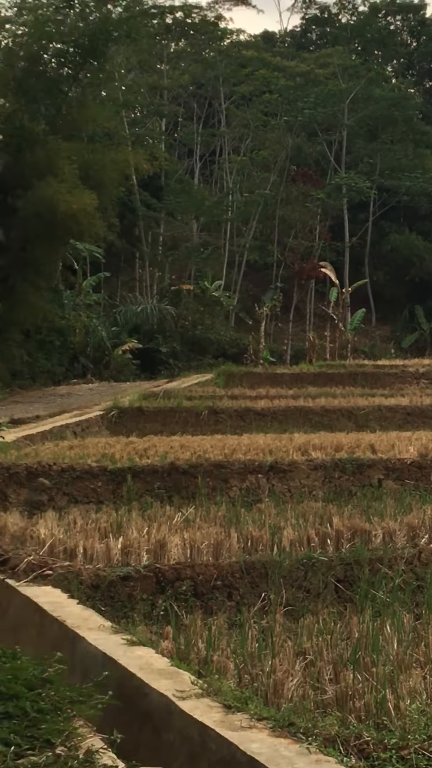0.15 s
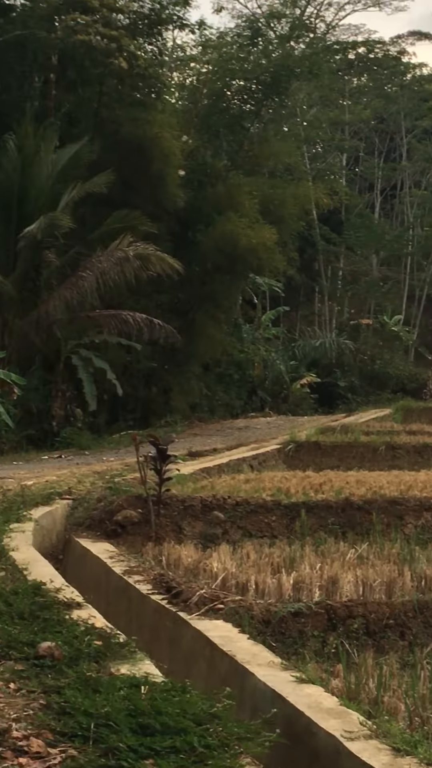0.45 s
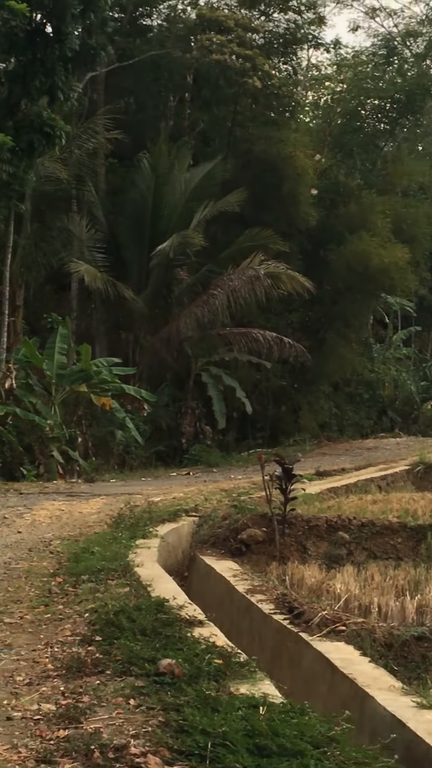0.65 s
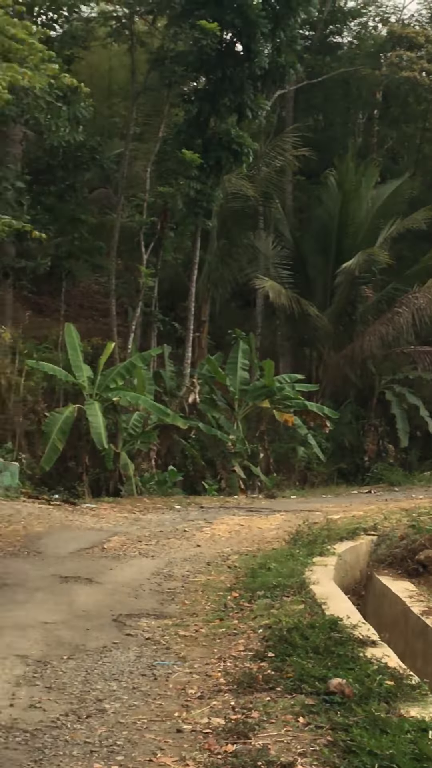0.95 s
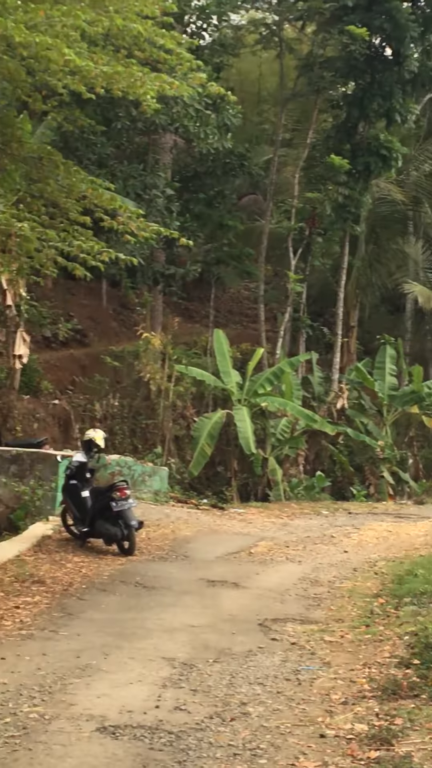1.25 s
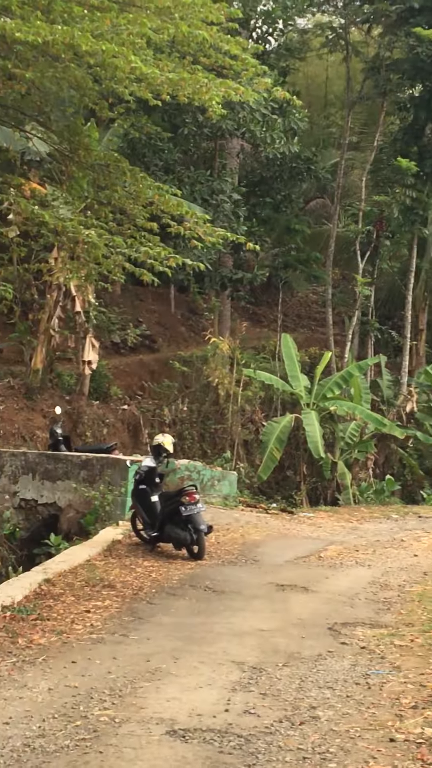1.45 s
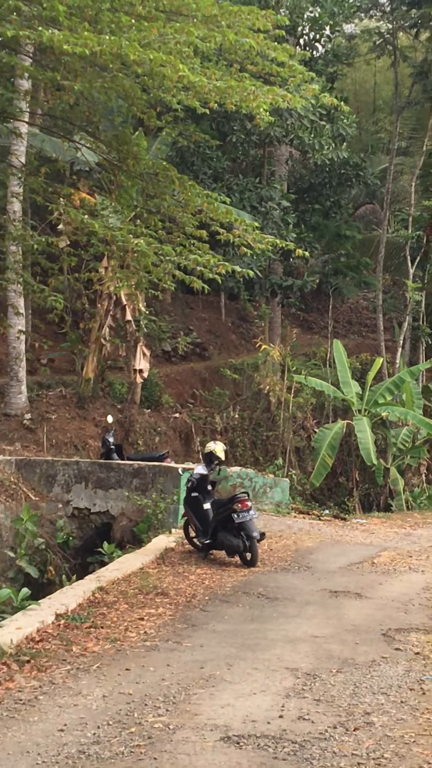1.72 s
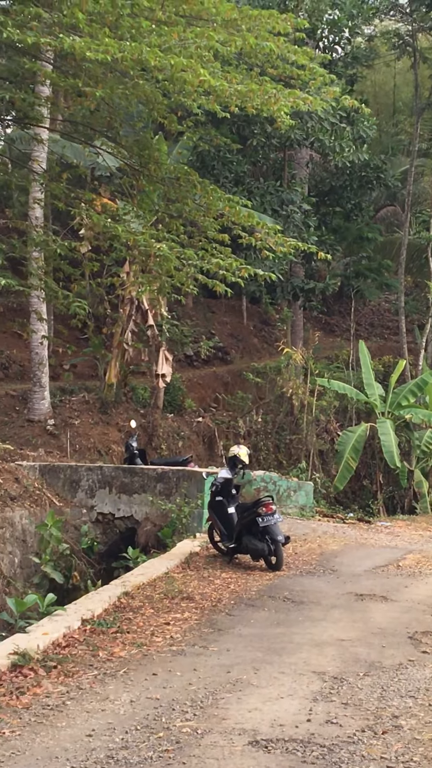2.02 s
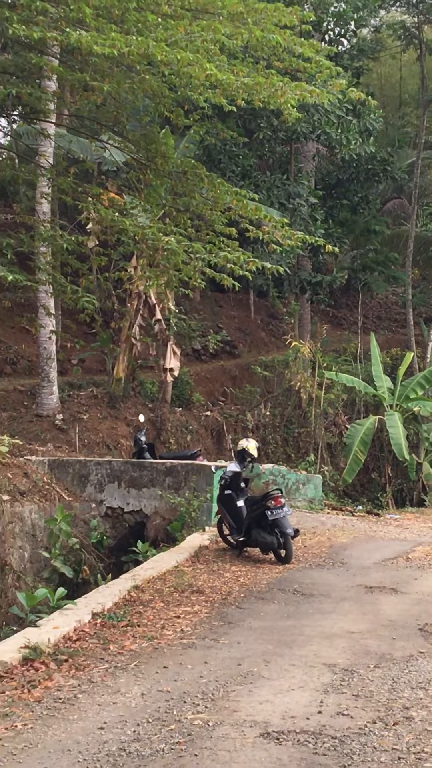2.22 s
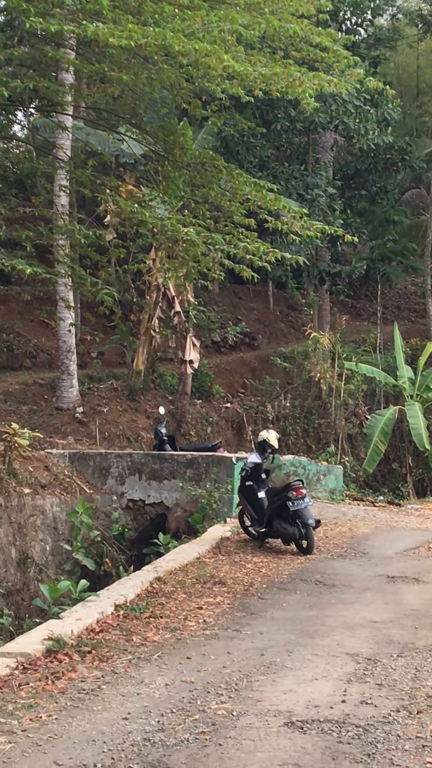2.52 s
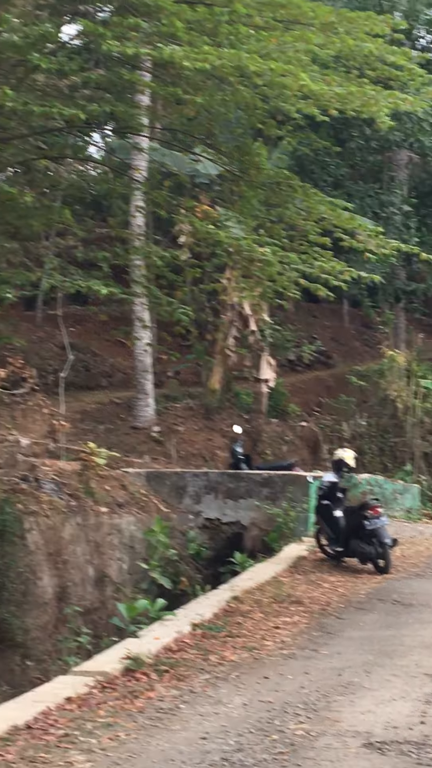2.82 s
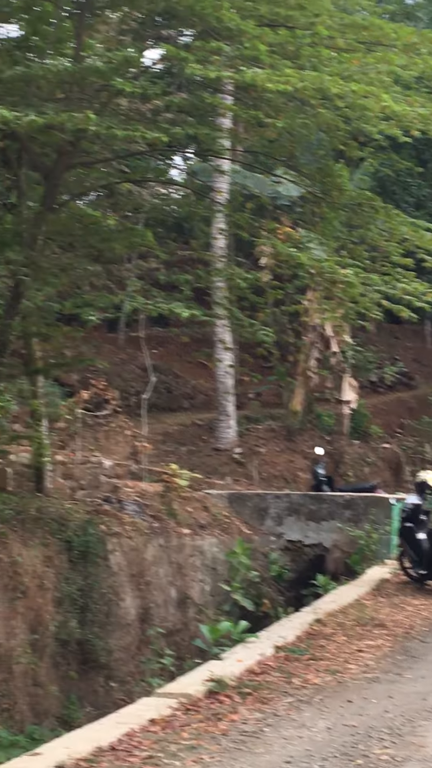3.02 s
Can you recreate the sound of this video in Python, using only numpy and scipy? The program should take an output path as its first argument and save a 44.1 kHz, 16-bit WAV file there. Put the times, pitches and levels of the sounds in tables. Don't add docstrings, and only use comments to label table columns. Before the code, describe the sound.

A motorbike's low, uneven single-cylinder thumping nears outdoors, slowing slightly until about 1.8 s. Dry leaves snap and rustle close to the phone microphone, mostly before 1 s, again near 2.7 s. Faint cicadas buzz over valley hum; a cricket trills at 0 and 1.2 s, and soft far bird notes sound until 2 s. From 2 s the throttle booms, with tyre roar and clatter swelling loudest at the 3.2 s end.

```python
import sys
import numpy as np
from scipy import signal
from scipy.io import wavfile
from scipy.ndimage import uniform_filter1d

SR = 44100
rng = np.random.default_rng(int(sys.argv[2]) if len(sys.argv) > 2 else 0)


def unload_audio(sound):
    columns = np.transpose(np.atleast_2d(sound))
    steps = np.round(np.clip(columns, -1, 1) * 32767)
    wavfile.write(sys.argv[1], SR, steps.astype(np.int16))


def boost(x):
    u = np.asarray(x, float) / 20
    return 10 ** u


N = 139356

# f/Hz, density/dB per Hz
VALLEY_SPECTRUM = [(200, 5.5), (370, -4.5), (750, -12.5), (1500, -14), (2700, -21), (4000, -24),
                   (8000, -35.5), (15700, -45)]
# start t/s, length/s, level/dB
CRICKET_TRILLS = [
    (0.0, 0.51, -70),
    (1.19, 0.5, -73.5),
]
# t/s, firing f/Hz
FIRING_RATE = [(0.0, 32.59), (0.3, 31.1), (0.6, 29.83), (0.9, 28.34), (1.15, 27.01), (1.4, 26.66),
               (1.62, 25.35), (1.8, 25.45), (1.95, 24.79), (2.1, 26.03), (2.25, 26.84), (2.45, 26.98),
               (2.65, 27.4), (2.8, 27.68), (2.95, 26.66), (3.16, 25.3)]
# t/s, exhaust level/dB, throttle level/dB, tyre level/dB, clatter level/dB
APPROACH = [(0, -41.5, -80, -75, -64), (.5, -38.5, -70, -69, -72), (1.0, -36, -61, -55.5, -70.5),
            (1.5, -34, -66, -64.5, -67.5), (1.8, -35.5, -45, -59.5, -70), (1.95, -35.5, -44.5, -65, -67.5),
            (2.1, -39, -36.5, -58, -67), (2.3, -37, -43, -52, -64), (2.5, -35.5, -35, -45, -62),
            (2.65, -33.5, -37, -43.5, -58), (2.8, -31, -35, -41.5, -49), (3.0, -31, -33, -37.5, -43),
            (3.16, -30.5, -33.5, -38, -41)]
# f/Hz, width/Hz, level/dB
CLATTER_BANDS = [(3560, 1700, 5.5), (4500, 500, -13), (6000, 1640, 5), (8470, 1800, 1.5), (12100, 5700, 1),
                 (14500, 2000, -25)]
# start t/s, length/s, from f/Hz, to f/Hz, level/dB
BIRD_NOTES = [
    (0.041, 0.091, 1700, 1815, -63),
    (0.154, 0.084, 1700, 2010, -61),
    (.78, 0.19, 1720, 1905, -60.5),
    (0.979, .27, 1916, 1960, -62),
    (.8, 0.55, 1400, 1500, -62.5),
    (1.3, 0.66, 1522, 1448, -62.5),
    (1.82, 0.2, 2050, 2080, -63),
    (1.82, 0.195, 1425, 1425, -65),
]
# t/s, peak level/dB, centre f/Hz
LEAF_SNAPS = [(.053, -38.5, 3130), (.343, -36, 2300), (0.35, -39, 7000), (.4065, -48, 3400),
              (.526, -35, 3460), (.5262, -37, 8000), (.545, -43, 2270), (0.694, -46, 12000),
              (0.725, -47, 2500), (0.842, -59.5, 6000), (0.8892, -34, 4170), (0.892, -39, 1830),
              (0.92, -44, 4170), (.9487, -42, 5460), (0.953, -46, 4500), (0.966, -47, 4000),
              (0.97, -48, 2500), (.981, -53, 6000), (2.659, -46, 3500), (2.708, -45, 6000)]
# middle t/s, half length/s, level/dB, centre f/Hz
LEAF_RUSTLES = [
    (.07, 0.093, -60.5, 4660),
    (.14, .02, -62, 13100),
    (0.204, 0.051, -65, 4000),
    (0.35, 0.039, -58, 7950),
    (0.347, 0.022, -51, 2220),
    (0.542, 0.023, -79, 4000),
    (.71, .03, -72, 11200),
    (.95, 0.044, -81, 5000),
    (1.55, .03, -64, 9000),
    (1.8, .015, -65, 4500),
]
# f/Hz, width/Hz, level/dB
TYRE_BANDS = [(306, 210, -5), (590, 940, -5), (1000, 410, -8.5), (1292, 274, -6), (1500, 1190, -1),
              (2500, 2200, -16)]


def unit(x):
    return x / np.sqrt(np.mean(x ** 2))


def band(x, hz, width_hz, order=1):
    high = hz + width_hz / 2
    edges = np.clip([hz * hz / high, high], 5, .48 * SR)
    return signal.sosfilt(signal.butter(order, edges, "bandpass", fs=SR, output="sos"), x)


def walk(rate):
    k = int(SR / rate)
    steps = np.repeat(rng.standard_normal(N // k + 1), k)
    return 1.36 * uniform_filter1d(uniform_filter1d(steps, k), k)[:N]


def hiss():
    return rng.standard_normal(N)


def specks(per_s, spread_db):
    hits = rng.random(N) < per_s / SR
    return hits * boost(spread_db * rng.exponential(size=N)) * np.sign(hiss())


def swell(t, start, length, edge_s):
    return np.clip(np.minimum(t - start, start + length - t) / edge_s, 0, 1)


def stroke(turns, at, length, ring, sag=0):
    u = (turns - at + .5) % 1 - .5
    return unit(-np.exp(-(u / length) ** 2) * np.cos(2 * np.pi * (ring - sag * u) * u))


def valley():
    hum, common = 0, walk(1.7)
    table_hz, table_db = np.array(VALLEY_SPECTRUM).T
    for hz in 200 * 2 ** (np.arange(19) / 3):
        density_db = np.interp(np.log(hz), np.log(table_hz), table_db)
        db = density_db + 10 * np.log10(hz) + common + 1.9 * walk(7.02)
        hum = hum + boost(db) * unit(band(hiss(), hz, hz / 4, order=2))
    rumble = unit(band(hiss(), 52, 30, order=2)) * boost(-54.5 + 2 * walk(7.7))
    return unit(hum) * boost(-49.5) + rumble


def cicadas(t):
    buzz_hz, throb_hz = 133.3, 9.2
    buzz = 1 + 0.27 * np.sin(2 * np.pi * (buzz_hz * t + 0.17 * walk(9)))
    throb = boost(1.64 * np.sin(2 * np.pi * (throb_hz * t + 0.13)))
    chorus = band(hiss(), 9400, 1100, order=3) * buzz * throb
    return unit(chorus) * boost(-64.5 + 2.1 * walk(1.33))


def cricket(t):
    trill = unit(band(hiss(), 7600, 280, order=2))
    return sum(boost(db) * swell(t, start, length, 0.062) * trill for start, length, db in CRICKET_TRILLS)


def exhaust(turns, size):
    blow = stroke(turns, at=.485, length=.2, ring=3.95, sag=.8) * size[0] ** .9
    crack = stroke(turns, at=.305, length=.1, ring=7.8) * size[1] ** 2.1
    return blow + boost(-15) * crack


def valve_gear(turns, size, valve_turn):
    puff = np.abs(stroke(turns, valve_turn, length=.15, ring=0)) * size[2] ** 2
    valve = unit(band(hiss() * puff, 1690, 240, order=2))
    gate = 1 + 0.093 * (puff - .4)
    grit = boost(-6) * unit(specks(per_s=490, spread_db=1.7))
    clatter = 0
    for k, (hz, width_hz, db) in enumerate(CLATTER_BANDS):
        rough = hiss() * gate + (-1) ** k * grit
        clatter = clatter + boost(db + walk(16)) * unit(band(rough, hz, width_hz, order=2))
    return unit(clatter) + boost(-3) * valve


def bird(t):
    out = 0
    for start, length, from_hz, to_hz, db in BIRD_NOTES:
        slide = np.exp(-np.clip(t - start, 0, 9) / (.25 * length))
        hz = to_hz + (from_hz - to_hz) * slide + 22 * walk(40)
        tone = np.sin(2 * np.pi * np.cumsum(hz) / SR)
        out = out + boost(db + 2 * walk(44.2)) * swell(t, start, length, 0.012) * tone
    return out


def leaves(t):
    out = np.zeros(N)
    for at, db, hz in LEAF_SNAPS:
        click = 5.5 * (np.abs(t - at) < .5 / SR)
        decay = (t >= at - .5 / SR) * np.exp(-np.clip(t - at, 0, 1) * SR / 50)
        snap = band((hiss() + click) * decay, hz, hz * 0.91, order=2)
        out += boost(db) * snap / np.abs(snap).max()
    for middle, half, db, hz in LEAF_RUSTLES:
        crackle = hiss() * boost(3.9 * walk(400))
        out += boost(db) * unit(band(crackle, hz, hz * 3.0)) * np.exp(-((t - middle) / half) ** 2)
    return out


def tyres(turns, valve_turn):
    pulse = 1 + 0.085 * np.cos(4 * np.pi * (turns - valve_turn))
    roar = 0
    for hz, width_hz, db in TYRE_BANDS:
        roar = roar + boost(db + walk(9.26)) * unit(band(hiss() * pulse, hz, width_hz, order=2))
    stones = unit(band(specks(per_s=110, spread_db=3.7), 1080, 1300))
    return unit(unit(roar) + boost(-8) * stones)


def airbox(turns, size):
    boom = np.sqrt(2) * np.cos(4 * np.pi * (turns - 0.575))
    gulp = stroke(turns + 0.0092 * walk(25), at=0.2597, length=0.18, ring=6.7) * size[1] ** 0.98
    bark = stroke(turns + walk(25) / 60, at=0.1093, length=0.19, ring=13.5) * size[2] ** 2
    return boom + boost(-5.5) * gulp + boost(-13) * bark * boost(2 * walk(8.08))


def motorbike(t):
    points = np.array(APPROACH).T
    exhaust_db, throttle_db, tyre_db, clatter_db = (np.interp(t, points[0], c) for c in points[1:])
    firing_hz = np.interp(t, *np.array(FIRING_RATE).T)
    turns = np.cumsum(firing_hz) / SR + .004 * walk(24.47)
    draws = rng.standard_normal((120, 3)).T
    size = [boost(np.interp(turns - .5, np.arange(120), c)) for c in draws]
    valve_turn = .27
    out = exhaust(turns, size) * boost(exhaust_db)
    out = out + valve_gear(turns, size, valve_turn) * boost(clatter_db)
    out = out + tyres(turns, valve_turn) * boost(tyre_db)
    return out + airbox(turns, size) * boost(throttle_db)


def roadside_echo(bike, t):
    t = t[:SR // 2]
    tail = hiss()[:SR // 2] * boost(-54) ** (t / .25) * (t > .012)
    return signal.fftconvolve(bike, tail / np.sqrt(np.sum(tail ** 2)))[:N]


def scene():
    t = np.arange(N) / SR
    background = valley() + cicadas(t) + cricket(t) + bird(t) + leaves(t)
    bike = motorbike(t)
    return (background + bike + boost(-18) * roadside_echo(bike, t))[None]


def band_limit(x):
    return signal.sosfilt(signal.butter(12, 15750, fs=SR, output="sos"), x)


def record(dry):
    low_cut = signal.butter(3, 42, "highpass", fs=SR, output="sos")
    mix = signal.sosfiltfilt(low_cut, dry)
    return band_limit(mix)


dry = scene()
out = record(dry)
unload_audio(out)
```